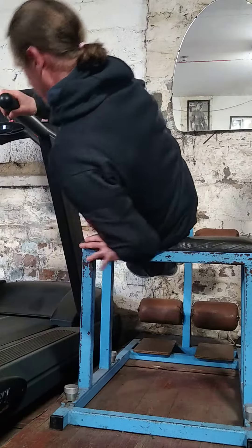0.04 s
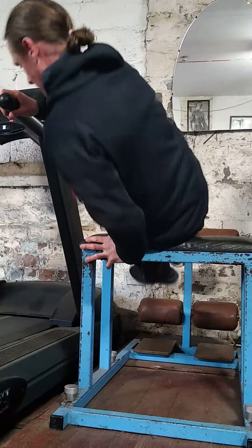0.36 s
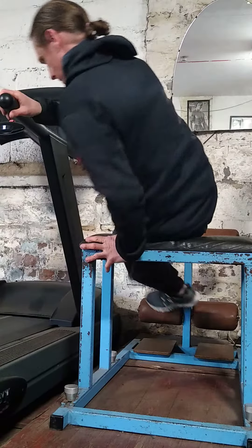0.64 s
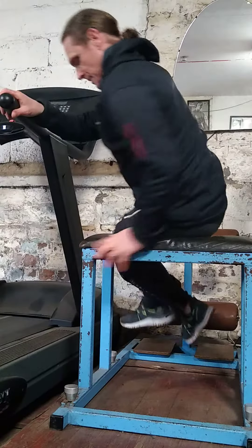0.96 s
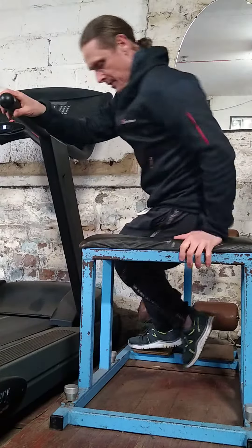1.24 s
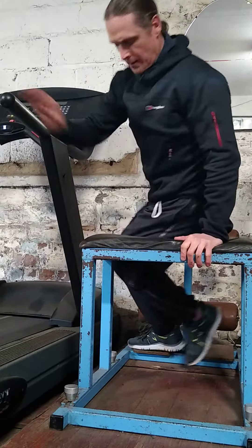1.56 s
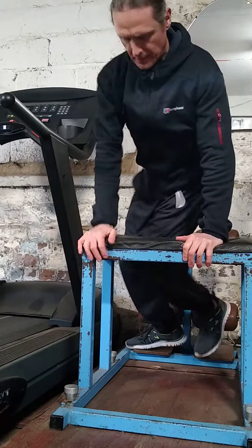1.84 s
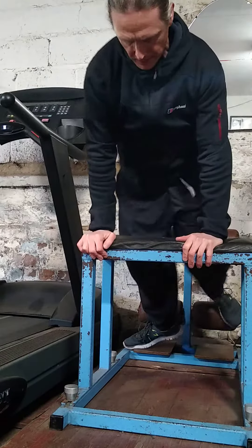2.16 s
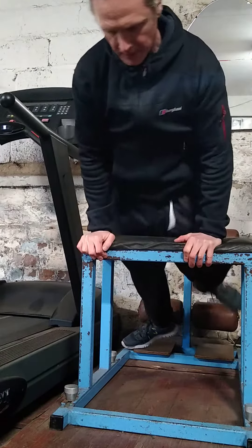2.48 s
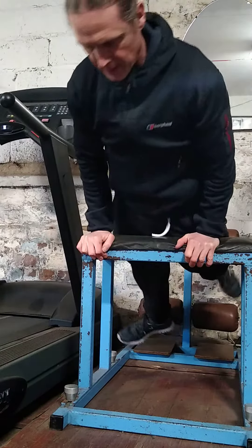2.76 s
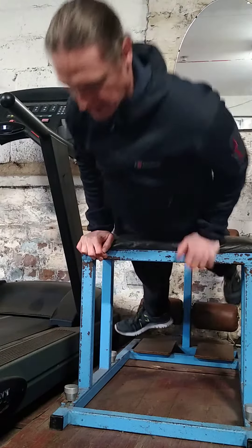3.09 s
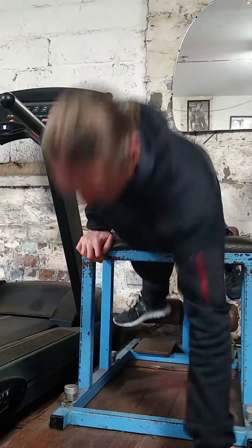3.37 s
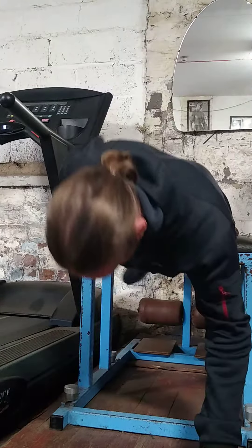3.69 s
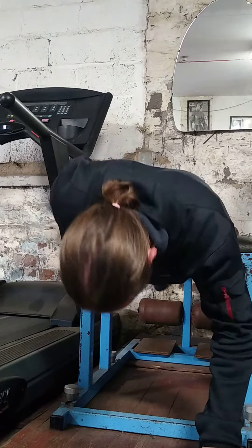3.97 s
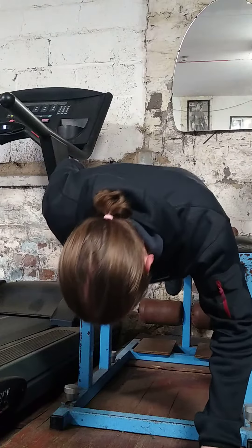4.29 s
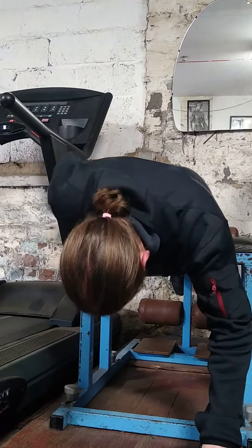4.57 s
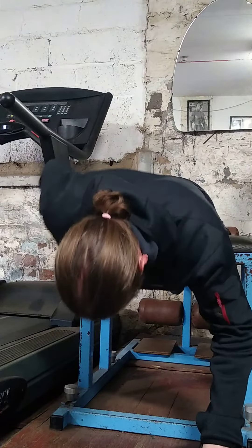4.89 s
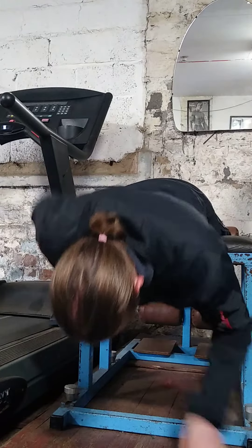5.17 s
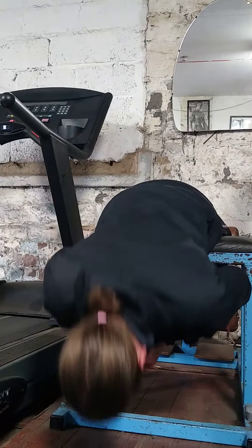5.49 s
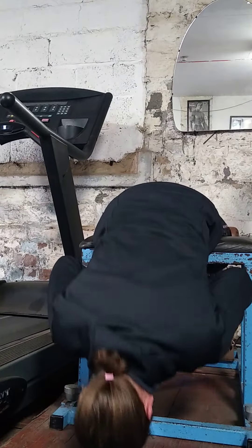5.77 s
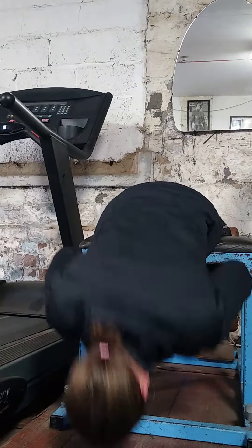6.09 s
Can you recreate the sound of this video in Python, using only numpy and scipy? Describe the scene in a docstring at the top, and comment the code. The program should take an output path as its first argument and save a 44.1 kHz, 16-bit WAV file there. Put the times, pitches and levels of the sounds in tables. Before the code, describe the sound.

In a small brick gym, a steel bench close by and a little to the right rattles with a few sharp clanks as a person shifts on it. Light taps, a dull heel knock and soft cloth rustle follow. Shoes scrape, then the frame clanks repeatedly around the low thud of a hand landing on floorboards. A final clank rings in the tubes, leaving faint taps and a quiet room rumble.

```python
"""A man climbs over a steel exercise bench in a small brick gym, amid cloth rustle and swells of hiss.
Half a second in, the loose frame clanks, sways and thumps on the wooden floor; then his heel taps the
foot rest. At 2.5 s his rubber soles scuff the frame. A run of clanks follows, and in the middle of it
one palm lands on the floorboards. A last clank at 5 s rings out in the tubes, then two faint taps.
All along, a noise gate turns the quiet background down between the knocks."""
import sys
import numpy as np
from scipy import signal
from scipy.fft import rfft, irfft, next_fast_len
from scipy.io import wavfile
from scipy.ndimage import uniform_filter1d, minimum_filter1d

SR = 44100
rng = np.random.default_rng(int(sys.argv[2]) if len(sys.argv) > 2 else 0)


def log_audio(samples):
    """Write samples as a 16-bit WAV file to the path given in sys.argv[1]."""
    # one column per channel
    frames = np.atleast_2d(samples).T
    # limit to full scale, then quantise
    limited = np.clip(frames, -1, 1)
    pcm = np.round(limited * 32767).astype(np.int16)
    wavfile.write(sys.argv[1], SR, pcm)


N = 275168
TIME = np.arange(N) / SR
HIT_TIME = np.arange(round(1.3 * SR)) / SR  # the clock of a single hit

# Levels in the tables are relative. A t60 is the time a sound takes to fade by 60 dB.
# the frame clanks: start_s, force_db, hardness_db, treble_db, ring_db, floor_knock_db, tube_pitch_hz
CLANKS = [(0.517, -54, -3, -9, -7.5, 5.5, 1450), (0.5701, -34, -10, -7, -3.5, -6, 1450),
          (0.6771, -26, -1.5, 7.5, -3.5, -6, 3140), (1.0416, -50.5, -14, 0, -9, 2.5, 1450),
          (2.3062, -44.5, -18, -24, -6, -1, 1900), (2.8558, -31, -9, 2.5, -19.5, -6, 1900),
          (2.869, -35, -8, -0.5, -22, -8, 1900), (3.1367, -50, -15, -7.5, -11.5, 1.5, 1450),
          (3.263, -24, 2.5, 6.5, -9, -7, 3140), (3.5957, -32, -9, -16.5, -1.5, -3.5, 1450),
          (3.6458, -27.5, 1.5, 11, -7.5, -4.5, 3600), (3.6563, -28, 6, 7, -10.5, -1, 3600),
          (3.9855, -33.5, -10.5, -4.5, -18, 0.5, 1570), (4.003, -30, -6.5, -9.5, -9.5, -3, 1590),
          (4.9625, -26, -1.5, -1, -1.5, -11, 4400)]
# the frame sways as his weight shifts: peak_s, level_db, rise_s
SWAYS = [(0.589, -27, 0.0073), (.69, -23, 0.021), (1.071, -47, 0.037), (2.333, -40.5, 0.0092),
         (3.272, -24.5, 0.015), (3.57, -30.5, .015), (3.665, -20.5, 0.017), (4.012, -29, 0.013),
         (4.748, -43.5, 0.047), (4.973, -30.5, 0.013)]
# shoes scrape over the frame: start_s, level_db
SCUFFS = [(1.004, -40.5), (2.533, -32), (2.619, -29.5), (2.644, -30), (2.689, -33.5)]
# light taps of shoes and hands: start_s, level_db, treble_db_per_octave
TAPS = [(0.136, -47, -24), (0.149, -51.5, -7.5), (1.042, -44.5, -4.5), (1.589, -51.5, -2), (1.711, -51, -7),
        (1.931, -51, 5.5), (2.102, -50, 4.5), (2.251, -52, -3.5), (3.034, -44.5, 3.5), (4.274, -55.5, -8.5),
        (4.649, -50, -2.5), (5.779, -59, -12), (6.166, -55, -14)]
# a joint or a sliding palm squeaks: peak_s, level_db, pitch_hz, half_length_s
SQUEAKS = [(1.197, -56, 4100, 0.016), (4.743, -58.5, 1329, 0.016)]
# cloth rustle and background hiss swell, then fade or cut off as the gate closes:
# peak_s, level_db, swell_s, fade_s
HISS_SWELLS = [(0.18, -68.5, 0.5, 0.42), (1.0, -62, 0.17, 0.34), (1.27, -48, 0.21, 0.11),
               (1.66, -60, 0.13, 0.6), (1.96, -64, 0.3, 0.39), (2.62, -63, 0.2, 1.1),
               (3.23, -56, 0.11, 0.6), (3.6, -51, 0.35, 0.2), (4.24, -61.5, 0.9, 0.17),
               (4.75, -77, 0.25, 0.2), (5.29, -56.5, 0.4, 0.061)]
# his weight rolls over the padded top: peak_s, level_db, swell_s, fade_s
WEIGHT_SHIFTS = [(0.17, -50.5, 0.17, 0.27), (0.75, -57, 0.9, 2.7), (2.1, -61, 2.2, 4.7),
                 (3.0, -55.5, 0.45, 0.46), (3.85, -52, 1.5, 0.44), (4.6, -59, 0.9, 1.4),
                 (5.24, -55, 0.4, 0.18)]

# groups of close tones at which the steel tubes ring: pitch_hz, width_hz, level_db
TUBE_TONES = [(984, 18, -5), (1366, 66, -2.5), (1454, 44, -1), (1553, 15, -6.5), (1888, 89, -2.5),
              (2380, 87, -4.5), (2640, 150, -4.5), (2932, 120, 0), (3114, 48, 3.5), (3415, 41, -1.5),
              (3635, 80, 0.5), (3926, 36, -9), (4300, 160, -5.5), (4450, 86, -5), (5330, 20, -2.5),
              (5420, 19, 4.5), (6030, 12, -1.5), (7010, 90, 1.5), (7380, 150, 1), (7845, 130, 2.5),
              (10400, 840, -1.5), (12700, 70, -0.5)]
# the tones of a struck part: pitch_hz, level_db, t60_s
BOARD_TONES = [(67.4, -16, 0.84), (87.7, -16.5, 0.52), (119.5, -0.5, 0.32), (147, 3, 0.097),
               (287.3, -15.5, 0.31), (395, -16.5, 0.28), (482.5, -15.5, 0.19), (575, -13, 0.14),
               (624.5, -5, 0.17), (679, -28.5, 0.12), (860, -24.5, 0.31)]
FOOT_REST_TONES = [(151, -16, 0.22), (512, -12, 0.11), (544, -2.5, 0.34), (609, -4.5, 0.05),
                   (653, -14, 0.064)]
# how long the tubes and the room ring: pitch_hz, t60_s
TUBE_DECAY = [(1000, 0.71), (1450, 1.43), (3100, 0.81), (4400, 1.02), (7500, 0.67), (13000, .35)]
GYM_DECAY = [(60, 0.94), (160, 0.89), (420, 0.81), (1200, 0.89), (3000, 1), (7500, 0.51), (14000, .35)]

# the tone colour of each noise: pitch_hz, level_db
STEEL_COLOUR = [(300, -35.5), (800, -12), (1400, 1), (2200, -3), (3200, -4), (4400, -1.5), (4850, -15.5),
                (5500, -6.5), (6400, -16.5), (7400, -14), (9000, -21.5), (12500, -22.5), (15500, -37.5)]
THUMP_COLOUR = [(25, -66.5), (45, -23.5), (68, 0), (100, -13), (145, 1.5), (180, 0), (260, -16.5),
                (500, -55), (2000, -100)]
WOOD_COLOUR = [(50, -49), (120, -35), (280, 3), (400, -2), (560, 0.5), (760, -9), (1100, -6), (2000, -30),
               (5000, -82.5)]
SLAP_COLOUR = [(30, -39.5), (70, -10.5), (140, -7.5), (300, -12.5), (620, -9.5), (900, -20.5), (1300, -28),
               (5000, -54)]
SOLE_COLOUR = [(35, -35.5), (60, -16), (234, -3.5), (317, -15.5), (390, -4.5), (798, -14), (1360, -9),
               (2110, -17.5), (4020, -20), (6380, -36), (10400, -40), (15000, -46)]
HISS_COLOUR = [(880, -46), (1500, -6.5), (1690, -10), (3000, -6), (3510, -11), (4100, -11.5), (4800, -16),
               (15500, -20.5)]
BODY_COLOUR = [(24, -40), (40, -11.5), (107, -1), (235, -4), (269, -4.5), (462, -10), (550, -8), (808, -10),
               (999, -14), (4000, -32.5), (5200, -62), (8800, -120)]
ROOM_COLOUR = [(15, -49), (25, -37), (49, -3.5), (107, -8), (173, -19), (240, -3.5), (305, -34), (469, -8),
               (509, -15), (552, -21.5), (895, -16.5), (1710, -20), (7700, -36), (15500, -32.5)]
# how alike left and right are: pitch_hz, likeness (1 = the same)
STEREO_LIKENESS = [(130, 0.99), (290, 0.9), (600, 0.84), (1400, -0.15), (2500, -0.04), (4500, -0.043),
                   (15000, 0.11)]
# the bench stands a little to the right: pitch_hz, left_minus_right_db
BENCH_BALANCE = [(300, 1.06), (1000, -1), (2500, -2.5), (5000, -4), (8000, -6), (14000, -6.5)]

FULL_FORCE_DB = -25  # a blow with his whole weight
RISE_S, RISE_DOUBLES_DB = 0.0028, 12.5  # rise at hardness 0 dB; the loss of hardness that doubles it
CHATTER_T60_S, CHATTER_DOUBLES_DB = 0.084, 21.5  # the same for the chatter's fade
STRUCK_BOOST_DB, STRUCK_WIDTH = 6, 0.073  # the struck tube rings louder, over this share of its pitch
THUMP_PER_FORCE, THUMP_PER_RING = 0.76, 0.39  # dB of floor thump gained per dB of each
SWAY_HZ, SWAY_SCATTER, SWAY_T60_S = 243.2, 0.013, 0.17  # scatter: share by which the load moves the pitch


def clanks():
    """Loose joints chatter and ring the tubes as the feet hit the floor; harder is brighter and shorter."""
    out = np.zeros((2, N))
    tube_noises = filtered(rng.standard_normal((len(CLANKS), 2, SR)), tube_gain)  # new for every blow
    for clank, tube_noise in zip(CLANKS, tube_noises):
        start_s, force_db, hardness_db, treble_db, ring_db, knock_db, tube_hz = clank
        rise_s = RISE_S * 2 ** (-hardness_db / RISE_DOUBLES_DB)
        chatter_s = CHATTER_T60_S * 2 ** (-hardness_db / CHATTER_DOUBLES_DB)
        brightness = [(1700, 6.28), (3600, hardness_db + 6.5), (6500, treble_db)]
        chatter = burst(STEEL_COLOUR, rise_s, chatter_s, grit_db=2)
        chatter = filtered(chatter, lambda hz: amp(value_at(brightness, hz)))
        # the tubes favour their own tones at once, and go on ringing in them
        steel = amp(force_db - 5.5) * filtered(chatter, lambda hz: 0.7 + 0.7 * tube_gain(hz))
        near_pitch = lambda hz: np.exp(-((hz / tube_hz - 1) / STRUCK_WIDTH) ** 2)
        struck_tube = filtered(tube_noise, lambda hz: amp(STRUCK_BOOST_DB * near_pitch(hz)))
        tubes = amp(ring_db - 5) * resonate(steel, die_away(struck_tube, TUBE_DECAY))
        # a blow that rings the tubes also drives the bench's feet into the boards
        thump_db = -33 + THUMP_PER_FORCE * (force_db - FULL_FORCE_DB) + THUMP_PER_RING * ring_db
        thump = amp(thump_db) * burst(THUMP_COLOUR, rise_s=0.0069, t60_s=0.31)
        knock = amp(force_db + knock_db) * burst(WOOD_COLOUR, rise_s=0.0025, t60_s=0.13, grit_db=5.5)
        add(out, start_s, tubes + in_gym(steel + thump + knock, echo_db=-2.5))
    return out


def tube_gain(hz):
    """How strongly the steel tubes ring at each pitch."""
    power = sum(amp(db) ** 2 / (1 + ((hz - pitch_hz) / (0.5 * width_hz)) ** 2) ** 2
                for pitch_hz, width_hz, db in TUBE_TONES)
    return np.sqrt(power)


def sways():
    """The frame bends under his weight: its lowest tone builds up, then dies away."""
    out = np.zeros((2, N))
    t = HIT_TIME - 0.2  # zero at the peak
    for (peak_s, db, rise_s), load in zip(SWAYS, rng.standard_normal(len(SWAYS))):
        swell = np.exp(np.minimum(t, 0) / rise_s) * amp(-60 * np.maximum(t, 0) / SWAY_T60_S)
        pitch_hz = SWAY_HZ * (1 + SWAY_SCATTER * load)
        add(out, peak_s + t[0], amp(db) * swell * np.sin(2 * np.pi * pitch_hz * t))
    return in_gym(out, echo_db=-15)


def soft_blow(tones, start_s, level_db, slap_db, slap_t60_s, echo_db):
    """A palm or heel lands: a dull slap, and the low tones of the part it hits."""
    out = np.zeros((2, N))
    ring = sum(rng.choice([-1, 1]) * amp(db - 60 * HIT_TIME / t60_s) * np.sin(2 * np.pi * hz * HIT_TIME)
               for hz, db, t60_s in tones)
    slap = amp(slap_db) * burst(SLAP_COLOUR, rise_s=0.00055, t60_s=slap_t60_s)
    add(out, start_s, amp(level_db) * in_gym(ring + slap, echo_db))
    return out


def scuffs_and_taps():
    """Rubber soles catch and slip on the frame; shoes and hands touch it lightly."""
    out = np.zeros((2, N))
    for start_s, db in SCUFFS:
        scuff = burst(SOLE_COLOUR, rise_s=0.0027, t60_s=0.2, tilt_db=-1)
        add(out, start_s, amp(db - 6.5) * scuff)
    for start_s, db, tilt_db in TAPS:
        tap = burst(SOLE_COLOUR, rise_s=0.00058, t60_s=0.032, grit_db=2, tilt_db=tilt_db)
        add(out, start_s, amp(db - 2) * tap)
    return in_gym(out, echo_db=-2.5)


def squeaks():
    """A joint or palm sticks and slips: a rough tone and its octave swell and fade."""
    out = np.zeros((2, N))
    for peak_s, db, pitch_hz, half_length_s in SQUEAKS:
        waver = unit(uniform_filter1d(rng.standard_normal(N), SR // 300))
        phase = 2 * np.pi * np.cumsum(pitch_hz * (1 + 0.025 * waver)) / SR
        swell = np.exp(-((TIME - peak_s) / half_length_s) ** 2)
        out += amp(db + 4.5) * swell * (np.sin(phase) + 0.25 * np.sin(2 * phase))
    return in_gym(out, echo_db=-2.5)


def hiss_and_rubbing():
    """Cloth rustle and background hiss swell, then fade or cut off; the body rubs dully on the pad."""
    hiss = swell_gain(HISS_SWELLS) * grainy_noise(HISS_COLOUR, N, grit_db=1.5)
    rubbing = np.hypot(swell_gain(WEIGHT_SHIFTS), amp(-66.5))  # faint even while he rests
    body = rubbing * grainy_noise(BODY_COLOUR, N, grit_db=3.5)
    return hiss + in_gym(body, echo_db=-7)


def swell_gain(swells):
    """Loudness of overlapping swells: each climbs 20 dB in swell_s and drops 20 dB in fade_s."""
    power = sum(amp(db - 20 * np.maximum((peak_s - TIME) / swell_s, (TIME - peak_s) / fade_s)) ** 2
                for peak_s, db, swell_s, fade_s in swells)
    return np.sqrt(power)


def in_gym(x, echo_db):
    """Add the echo of the brick walls."""
    walls = die_away(spread(rng.standard_normal((2, SR))), GYM_DECAY)
    return x + amp(echo_db) * resonate(x, walls)


def room_background():
    """The room's steady low rumble and faint hiss."""
    return amp(-62) * grainy_noise(ROOM_COLOUR, N, grit_db=0.5)


def grainy_noise(colour, n, grit_db, tilt_db=0):
    """Stereo noise of tiny grains, uneven by grit_db; the treble tilts by tilt_db an octave."""
    sizes = np.repeat(amp(grit_db * rng.standard_normal(n // 64 + 1)), 64)[:n]
    grains = spread(sizes * rng.standard_normal((2, n)))
    treble_octaves = lambda hz: np.log2(np.maximum(hz / 1800, 1))
    return unit(filtered(grains, lambda hz: amp(value_at(colour, hz) + tilt_db * treble_octaves(hz))))


def burst(colour, rise_s, t60_s, grit_db=0, tilt_db=0):
    """A short run of contacts that swells and dies, with a strength of about 1 at its peak."""
    t = HIT_TIME[:SR // 2]
    shape = (1 - np.exp(-t / rise_s)) * amp(-60 * t / t60_s)
    sound = unit(grainy_noise(colour, len(t), grit_db, tilt_db) * shape)
    sound *= np.sqrt(np.mean(shape ** 2)) / shape.max()
    return np.pad(sound, ((0, 0), (0, len(HIT_TIME) - len(t))))


def die_away(pair, decays):
    """Make each pitch of a steady sound fade at its own speed."""
    hz, t, bands = signal.stft(pair, SR, nperseg=256)
    fade = amp(-60 * t / value_at(decays, hz)[:, None])
    return signal.istft(bands * fade, SR, nperseg=256)[1]


def resonate(x, tail):
    """Every sample of x sets off a copy of the tail, which is scaled to an energy of 1."""
    tail = unit(tail) / np.sqrt(tail.shape[-1])
    return signal.fftconvolve(x, tail, axes=1)[:, :x.shape[-1]]


def spread(pair):
    """Two unrelated signals become left and right: alike in the bass, apart in the treble."""
    angle = lambda hz: np.arccos(np.clip(value_at(STEREO_LIKENESS, hz), -1, 1)) / 2
    mid, side = filtered(pair, lambda hz: np.array([np.cos(angle(hz)), np.sin(angle(hz))]))
    return np.array([mid + side, mid - side])


def filtered(x, gain_at):
    """Turn each pitch of x up or down by gain_at(hz)."""
    n = x.shape[-1]
    padded = next_fast_len(n + 8192, True)
    return irfft(rfft(x, padded) * gain_at(np.fft.rfftfreq(padded, 1 / SR)), padded)[..., :n]


def value_at(points, hz):
    """Read between the (pitch_hz, value) rows of a table, with octaves evenly spaced."""
    pitches, values = np.transpose(points)
    return np.interp(np.log(hz + 1), np.log(pitches), values)


def add(track, start_s, sound):
    """Mix a sound into the track at start_s."""
    i = round(start_s * SR)
    track[:, i:i + sound.shape[-1]] += sound[..., :N - i]


def amp(db):
    """Decibels to gain."""
    return 10 ** (np.asarray(db) / 20)


def unit(x):
    """Scale to an average strength (rms) of 1."""
    return x / np.sqrt(np.mean(x ** 2) + 1e-20)


def noise_gate(x, threshold_db, depth_db, hold_s, glide_s):
    """Full volume while the sound is loud and for a short hold, then the volume sinks."""
    power = uniform_filter1d(np.mean(x ** 2, axis=0), SR // 100)
    level_db = 10 * np.log10(np.abs(power) + 1e-12)
    shut = np.clip((threshold_db - level_db) / 10, 0, 1)  # fully shut 10 dB below the threshold
    hold, glide = int(hold_s * SR), int(glide_s * SR)
    held = minimum_filter1d(shut, hold, origin=(hold - 1) // 2)
    smoothed = uniform_filter1d(held, glide, origin=(glide - 1) // 2)
    return x * amp(-depth_db * np.minimum(held, smoothed))


def scene():
    """The bench and the blows, a little to the right, over hiss, rubbing and the room's background."""
    bench = clanks() + sways() + scuffs_and_taps() + squeaks()
    palm = soft_blow(BOARD_TONES, start_s=3.458, level_db=-20.5, slap_db=-4, slap_t60_s=0.077, echo_db=-9)
    heel = soft_blow(FOOT_REST_TONES, start_s=1.268, level_db=-36, slap_db=-6, slap_t60_s=0.12, echo_db=-7)
    left_right = lambda hz: amp(np.outer([0.5, -0.5], value_at(BENCH_BALANCE, hz)))
    return filtered(bench + palm + heel, left_right) + hiss_and_rubbing() + room_background()


def record(dry):
    """A noise gate, then the deepest bass and the highest treble are cut away."""
    gated = noise_gate(dry, threshold_db=-45.5, depth_db=8, hold_s=0.047, glide_s=0.052)
    bass_cut = signal.butter(4, 48, "high", fs=SR, output="sos")
    return filtered(signal.sosfilt(bass_cut, gated), lambda hz: hz < 15750)


dry = scene()
out = record(dry)
log_audio(out)
```